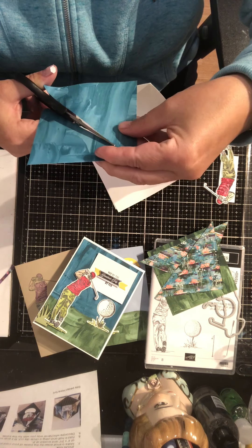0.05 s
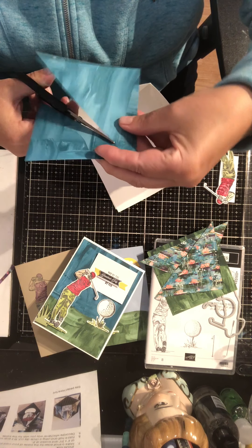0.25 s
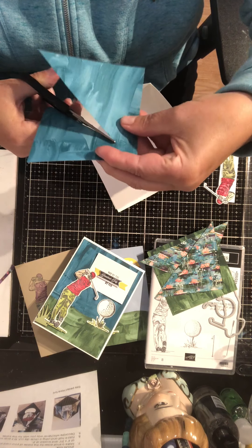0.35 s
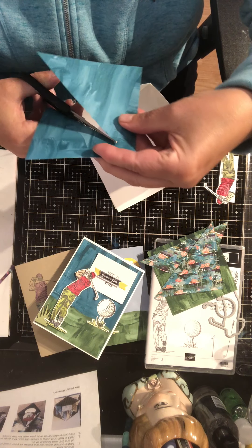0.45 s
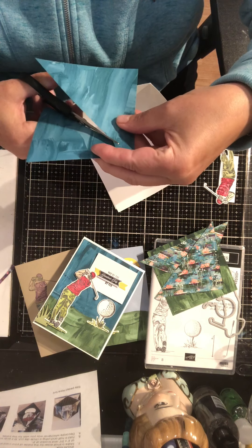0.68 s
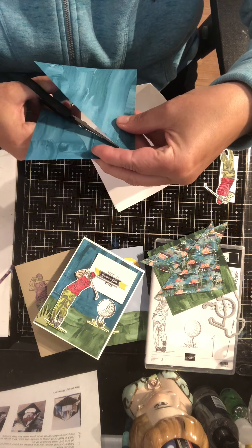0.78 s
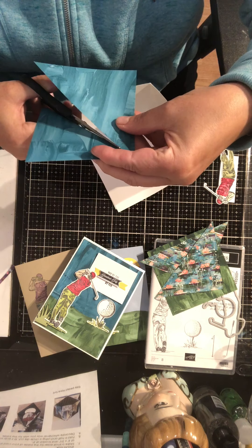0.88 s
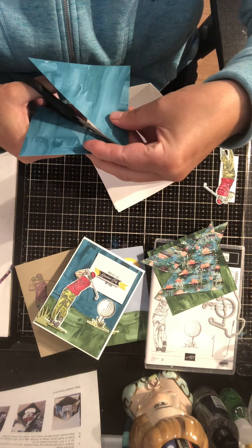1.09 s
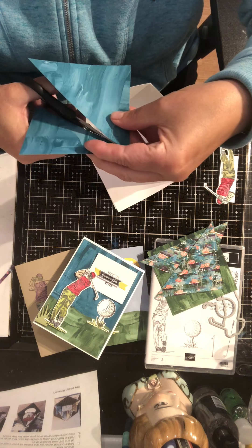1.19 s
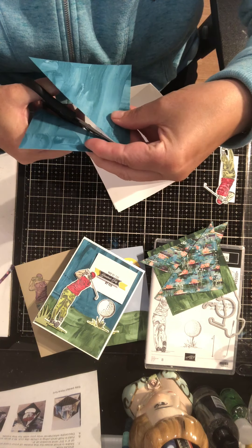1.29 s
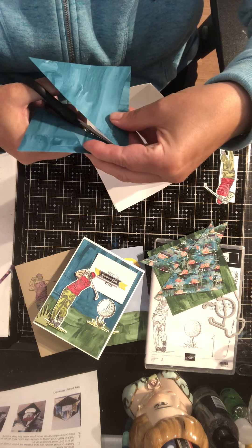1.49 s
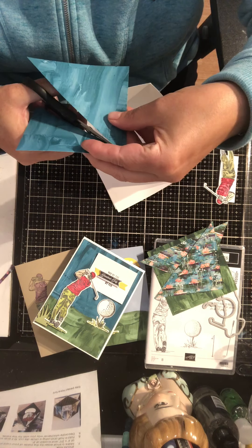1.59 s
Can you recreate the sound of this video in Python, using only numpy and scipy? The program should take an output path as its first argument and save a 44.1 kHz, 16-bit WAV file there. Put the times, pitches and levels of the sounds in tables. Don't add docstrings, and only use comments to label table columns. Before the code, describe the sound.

Scissors cut paper, heard close in a quiet room with a short faint echo. Bright nicks and crackle open at 0 s; the handles snap shut with a hard metallic click at 0.25. A long loud crunching stroke runs 0.4-0.58, sharp nicks cluster around 0.7-0.8, a bright stroke follows at 0.95-1.1, short snips at 1.22-1.3, and a softer cut from 1.45 fades dully to the end.

```python
import sys
import numpy as np
from scipy import signal
from scipy.fft import rfft, irfft
from scipy.io import wavfile
from scipy.ndimage import uniform_filter1d

SR = 44100
rng = np.random.default_rng(int(sys.argv[2]) if len(sys.argv) > 2 else 0)


def voltage_ratio(level):
    return 10 ** (np.asarray(level, float) / 20)


def to_wav(sig):
    pcm = np.clip(np.atleast_2d(sig), -1, 1) * 32767
    pcm = np.round(pcm).astype(np.int16)
    wavfile.write(sys.argv[1], SR, pcm.T)


N = 72765


def evened(x):
    return x / np.sqrt(np.mean(x ** 2) + 1e-20)


def read(points, hz):
    f, value = np.transpose(points)
    return np.interp(np.log(hz + 1), np.log(f + 1), value)


def add(mix, start_s, sound):
    at = round(start_s * SR)
    sound = sound[max(-at, 0):]
    part = mix[max(at, 0):][:len(sound)]
    part += sound[:len(part)]


def low_cut(x, hz):
    return signal.sosfilt(signal.butter(2, hz, "high", fs=SR, output="sos"), x)


def colour(x, points, tilt_db=0):
    hz = np.fft.rfftfreq(len(x), 1 / SR)
    gain_db = read(points, hz) + tilt_db * np.log2((hz + 50) / 2000)
    return evened(irfft(rfft(x) * voltage_ratio(gain_db), len(x)))


def resonate(x, hz, width_hz):
    r = np.exp(-np.pi * width_hz / SR)
    return 2 * signal.lfilter([1 - r], [1, -r * np.exp(2j * np.pi * hz / SR)], x).real


def tears(spread_db, size):
    tears_per_s = 12010
    side, chance, luck = rng.random((3, size))
    click = np.sign(side - .5) * np.clip((tears_per_s / SR - chance) * 50, 0, 1)
    return click * voltage_ratio(spread_db * np.minimum(-np.log(luck + 1e-9), 4))


def patchy(x):
    patch_db = 2.5
    z = signal.stft(x, nperseg=256)[2]
    over_time = uniform_filter1d(rng.standard_normal(z.T.shape), size=6, axis=0)
    patches = uniform_filter1d(over_time, size=5, axis=1).T
    return evened(signal.istft(z * voltage_ratio(patch_db * evened(patches)), nperseg=256)[1][:len(x)])


# pitch_hz [Hz], level_db [dB per Hz]
PAPER_COLOUR = [(88, -48), (150, -16.5), (534, -7), (1040, -6), (1690, 0.5), (1940, -4), (3160, -2.5),
                (8070, -16), (16000, -26.5)]
# start_s [s], length_s [s], level_db [dB], brightness_db [dB per octave], swell_db [dB]
STROKES = [
    (.216, .045, -54, -2.2, 7),
    (0.401, .175, -47.5, 0, 8),
    (.598, .04, -64.5, -2.2, 1.5),
    (.954, .143, -49, 1.2, 2.5),
    (1.246, 0.0605, -51, 0.5, 2),
    (1.456, 0.13, -57, 0.5, 1),
    (.72, 0.068, -50, 0, 10),
    (0, .062, -54, 2.5, 2.5),
    (1.217, 0.032, -53.5, 0, 5.5),
    (1.575, 0.11, -68.5, -4, 2),
]


def cut(start_s, length_s, level_db, tilt_db, swell_db):
    rise_s, fall, fastest, speed_tilt_db = 0.0083, .18, 0.42, 2.5
    t = np.arange(10000) / SR
    speed = np.sin(np.pi * np.clip(t / length_s, 0, 1) ** (np.log(.5) / np.log(fastest)))
    ends = np.clip(t / rise_s, 0, 1) * np.clip((length_s - t) / (fall * length_s), 0, 1)
    shape = ends * voltage_ratio(swell_db * (speed - 1.5))
    grains = patchy(tears(3, 10000))
    slow = colour(grains, PAPER_COLOUR, tilt_db - speed_tilt_db)
    fast = colour(grains, PAPER_COLOUR, tilt_db + speed_tilt_db)
    return start_s, voltage_ratio(level_db) * shape * (slow + speed ** 2 * (fast - slow))


def catch(start_s, length_s, level_db, tilt_db, ring_hz, peak, stuff):
    u = np.arange(2048) / SR / length_s
    shape = np.clip(u / peak, 0, 1) * np.exp(-2.5 * np.clip((u - peak) / (1 - peak), 0, 40) ** 1.3)
    grains = patchy(tears(2, 2048))
    crackle = shape * colour(grains, stuff, tilt_db)
    ring = resonate(shape * evened(grains), ring_hz, 450)
    sound = crackle + voltage_ratio(-8) * ring * np.linalg.norm(crackle) / np.linalg.norm(ring)
    return start_s, voltage_ratio(level_db) * sound * np.sqrt(length_s * SR / np.sum(sound ** 2))


# start_s [s], length_s [s], level_db [dB], brightness_db [dB per octave], ring_hz [Hz]
NICK_EVENTS = [(.001, .011, -47, 2.5, 1510), (.044, .011, -41, 3.5, 2820), (.112, .006, -65.5, 0, 3000),
               (.137, .012, -61, 0.5, 1620), (.235, 0.0059, -48.5, 0.5, 3000),
               (.735, 0.011, -44.5, 1, 3400), (.743, .013, -39, 3, 3770), (.756, 0.017, -41, 2, 3190),
               (1.227, 0.019, -48.5, 0, 2400), (1.260, .012, -50.5, 2.5, 1693),
               (1.291, .010, -46.5, 1.5, 2200), (1.423, 0.0069, -65.5, 1, 3160)]


def nick(*row):
    return catch(*row, 0.42, PAPER_COLOUR)


# start_s [s], length_s [s], level_db [dB], brightness_db [dB per octave], ring_hz [Hz]
TICK_EVENTS = [(0, .006, -43, 1, 2300), (.018, 0.011, -49, 2, 2900), (.034, 0.0048, -46, -1, 4480),
               (.170, 0.0077, -57, 1.5, 1631), (.693, .007, -54, 2, 1660), (.729, 0.0049, -54, 3, 6100),
               (.792, .014, -41, 2.5, 2300), (1.161, 0.0078, -57, 1.5, 2600), (1.221, 0.006, -58, 5, 3890),
               (1.250, 0.0097, -48.5, -1.5, 1730), (1.281, 0.0097, -52, -5, 1660),
               (.243, 0.0016, -40, -3, 7500), (.404, 0.0067, -62, 3.5, 1710)]


def tick(*row):
    return catch(*row, 0.099, PAPER_COLOUR)


# pitch_hz [Hz], width_hz [Hz], level_db [dB]
BLADE_RINGS = [(1340, 92, -5), (1660, 100, 1.5), (2230, 130, -2), (2594, 110, -3), (3200, 200, -5),
               (4060, 200, -2), (4550, 120, -7), (5040, 130, -3), (5360, 90, -5), (6130, 120, -2),
               (6910, 90, -2), (7790, 100, -3), (8330, 120, -6), (9700, 120, -6)]


def blades(x):
    ringing = sum(voltage_ratio(level_db) * resonate(x, hz, width_hz) for hz, width_hz, level_db in BLADE_RINGS)
    return x + voltage_ratio(5) * ringing


# start_s [s], length_s [s], level_db [dB], pitch_hz [Hz], width_hz [Hz]
FLEX_EVENTS = [(0, 0.018, -59, 400, 300), (.045, .006, -49, 540, 32), (.012, .04, -62, 550, 250),
               (.41, 0.12, -60, 540, 210), (0.441, 0.068, -69, 202.4, 110), (0.731, .045, -54, 655, 180),
               (0.795, .012, -51, 550, 36), (0.793, 0.013, -54.5, 840, 115), (.96, .1, -60, 340, 200),
               (1.234, 0.079, -64.5, 800, 300), (1.458, 0.093, -70, 690, 300), (.138, .009, -58, 1650, 120),
               (.171, .008, -58, 1650, 150), (.171, .008, -65, 2780, 150), (.42, .15, -63, 1665, 110),
               (1.452, .115, -64, 1693, 200), (1.25, 0.052, -57, 1710, 110),
               (1.005, 0.088, -62.5, 1730, 190), (.216, .028, -59, 2500, 900), (.794, .012, -50, 1760, 140),
               (.41, .13, -62, 2200, 300), (.43, .1, -62, 4200, 700), (.99, .045, -62, 7800, 500),
               (.99, .06, -63, 6150, 250), (.96, .05, -61, 3180, 250), (1.46, .1, -66, 2300, 200),
               (.955, .11, -64, 800, 500)]


def flex(start_s, length_s, level_db, hz, width_hz):
    u = np.arange(10000) / SR / length_s
    shaking = np.sin(np.pi * np.clip(u, 0, 1)) * rng.standard_normal(10000)
    sound = resonate(resonate(shaking, hz, width_hz), hz, 350)
    return start_s, voltage_ratio(level_db) * sound * np.sqrt(length_s * SR / np.sum(sound ** 2))


# start_s [s], length_s [s], level_db [dB],
# lowest_hz [Hz]
FIZZ_EVENTS = [(.2475, .004, -39, 5500), (.2425, .003, -44, 6000), (.251, .03, -57, 5000),
               (.962, .125, -62, 8000), (.404, .11, -75, 9000), (0, .008, -55, 6500),
               (.0343, .004, -50, 4000), (.740, .014, -58, 6000), (1.423, .007, -71, 2600),
               (1.161, .006, -64, 3500), (1.292, .01, -64, 6000)]


def fizz(start_s, length_s, level_db, lowest_hz):
    u = np.arange(8000) / SR / length_s
    bright = low_cut(tears(3, 8000), lowest_hz)
    soft = signal.lfilter([.5, .5], [1], bright)
    shape = np.sin(np.pi * np.clip(u, 0, 1) ** .7) ** .6
    return start_s, voltage_ratio(level_db) * shape * evened(soft)


# peak_s [s], level_db [dB], pitch_hz [Hz], rise_s [s], fade_60db_s [s]
PING_EVENTS = [(.7955, -36, 3180, .003, .028), (.799, -48, 885, .004, .035), (.7955, -46, 7000, .002, .02),
               (.7645, -38, 3190, .004, .02), (.75, -39, 3200, .003, .015), (.7415, -46, 650, .004, .02),
               (.742, -48, 7000, .002, .03), (.749, -44, 7000, .004, .02), (.048, -43, 2850, .003, .025),
               (.0355, -42, 4350, .001, .012), (.003, -46, 2700, .003, .015), (.004, -51, 500, .004, .05),
               (1.163, -62, 2800, .001, .02), (1.462, -57, 2270, .003, .03), (1.297, -50, 2300, .003, .02)]
# peak_s [s], level_db [dB], pitch_hz [Hz], rise_s [s], fade_60db_s [s]
HANDLE_PINGS = [(.2462, -22, 1670, .003, .025), (.247, -35, 840, .003, .045), (.2438, -41, 7500, .001, .01),
                (.2438, -42, 5000, .001, .01), (.2476, -29, 3140, .002, .012),
                (.2495, -22, 1400, .006, .022), (.249, -19, 2130, .003, .01),
                (.249, -17, 2290, .0035, .018), (.249, -22, 2690, .002, .022),
                (.2491, -21, 3570, .0015, .022), (.2492, -24, 4120, .0015, .015),
                (.249, -26, 4740, .0015, .014), (.249, -23, 5255, .0015, .017),
                (.2488, -30, 5900, .001, .005), (.249, -35, 7450, .001, .005), (.2515, -31, 535, .004, .03),
                (.251, -47, 240, .006, .07), (.2505, -39, 370, .004, .035), (.2537, -29, 1660, .002, .03),
                (.2528, -27, 2130, .0015, .015), (.2545, -33, 3140, .002, .03),
                (.2603, -33, 1400, .002, .02), (.2605, -35, 1670, .002, .02),
                (.2602, -30, 2310, .0015, .02), (.261, -33, 2130, .0015, .025),
                (.2603, -35, 2690, .0015, .02), (.26, -40, 3570, .0015, .02), (.262, -38, 640, .003, .05)]


def ping(peak_s, level_db, hz, rise_s, fade_s):
    t = np.arange(-400, 8000) / SR
    rise = np.sin(np.pi / 2 * np.clip(1 + t / rise_s, 0, 1)) ** 2
    shape = rise * voltage_ratio(level_db - 60 * np.maximum(t, 0) / fade_s)
    return peak_s + t[0], -shape * np.sin(2 * np.pi * hz * t)


# pitch_hz [Hz], level_db [dB per Hz]
AIR_COLOUR = [(15, -29), (25, -12.5), (137, -2), (754, -8), (1100, -20.5), (1290, -11.5), (2410, -22),
              (7710, -23.5), (16000, -31.5)]


def air():
    return voltage_ratio(-70.5) * colour(rng.standard_normal(N), AIR_COLOUR)


# pitch_hz [Hz], fade_60db_s [s]
ECHO_FADE = [(200, .27), (600, .21), (2000, .19), (5000, .2), (8000, .2), (12000, 0.11)]


def room(x):
    taps = np.zeros(SR // 2)
    at = np.arange(200, SR // 2 - 20, 20)
    taps[at + rng.integers(0, 20, len(at))] = rng.choice([-1., 1.], len(at))
    hz, t, z = signal.stft(taps, SR, nperseg=256)
    tail = signal.istft(z * voltage_ratio(-60 * t / read(ECHO_FADE, hz)[:, None]), SR, nperseg=256)[1]
    return signal.fftconvolve(x, tail / np.linalg.norm(tail))[:N]


# pitch_hz [Hz], level_db [dB per Hz]
HANDLE_COLOUR = [(150, -38), (550, -19), (1000, -22), (1450, -5), (2300, -3), (5000, -18), (8000, -39),
                 (16000, -70)]
# start_s [s], length_s [s], level_db [dB], brightness_db [dB per octave], ring_hz [Hz]
SNAP_EVENTS = [
    (.2438, .005, -34, -1.5, 1580),
    (.2474, 0.0031, -27, 0, 3800),
    (.2504, .005, -33, -2, 1900),
    (.2585, 0.0045, -40, -2, 2150),
    (.265, .007, -43, -2, 1386),
]


def snap(*row):
    return catch(*row, .55, HANDLE_COLOUR)


def thud():
    pitch_hz, fade_s = 170, .17
    t = np.arange(8000) / SR
    puff = resonate(resonate(rng.standard_normal(8000), pitch_hz, 120), pitch_hz, 120)
    return .25, voltage_ratio(-51 - 60 * t / fade_s) * np.clip(t / 0.0081, 0, 1) * evened(puff)


def hum():
    start_s, length_s = 1.32, 0.24
    swell = np.sin(np.pi * np.clip((np.arange(N) / SR - start_s) / length_s, 0, 1))
    return voltage_ratio(-70) * swell * evened(resonate(rng.standard_normal(N), 101.8, 6))


def scene():
    work = np.zeros(N)
    for table, source in (STROKES, cut), (NICK_EVENTS, nick), (TICK_EVENTS, tick), (SNAP_EVENTS, snap):
        for row in table:
            add(work, *source(*row))
    work = voltage_ratio(-5.5) * blades(low_cut(work, 300))
    for table, source in (FLEX_EVENTS, flex), (FIZZ_EVENTS, fizz), (PING_EVENTS, ping), (HANDLE_PINGS, ping):
        for row in table:
            add(work, *source(*row))
    add(work, *thud())
    return (work + voltage_ratio(-16) * room(work) + air() + hum())[None]


def band_limit(x):
    return signal.sosfilt(signal.butter(12, 16520, fs=SR, output="sos"), x)


def record(dry):
    band = low_cut(dry, 45)
    band = signal.oaconvolve(band, signal.firwin(201, 15650, fs=SR)[None], "same")
    return band_limit(band)


dry = scene()
out = record(dry)
to_wav(out)
```